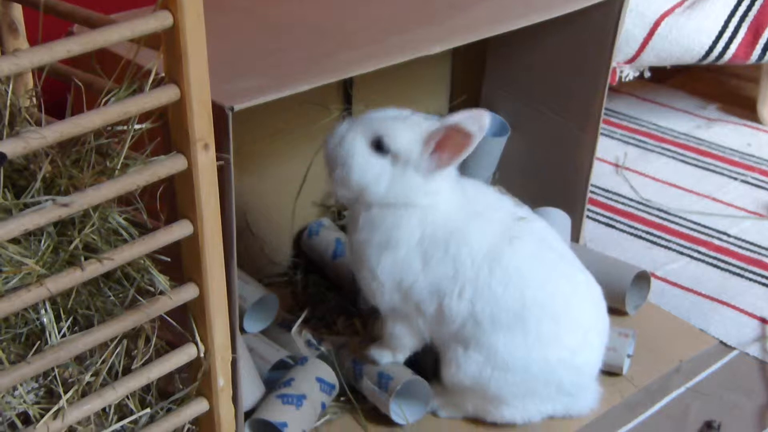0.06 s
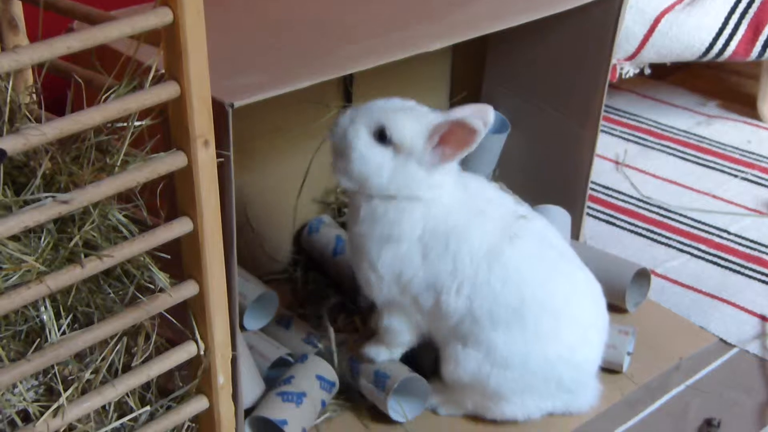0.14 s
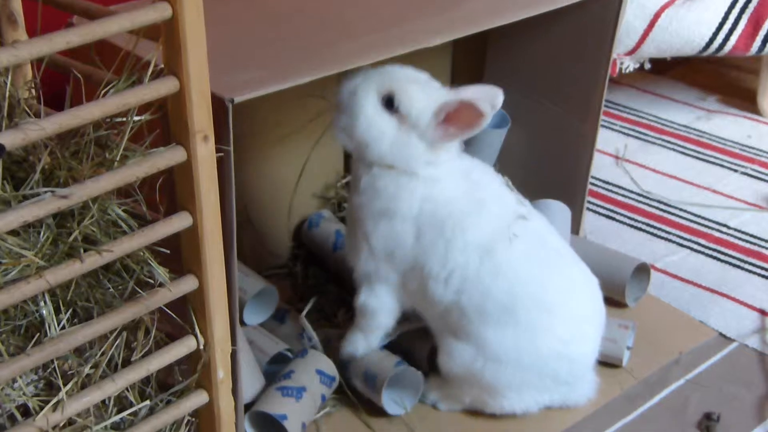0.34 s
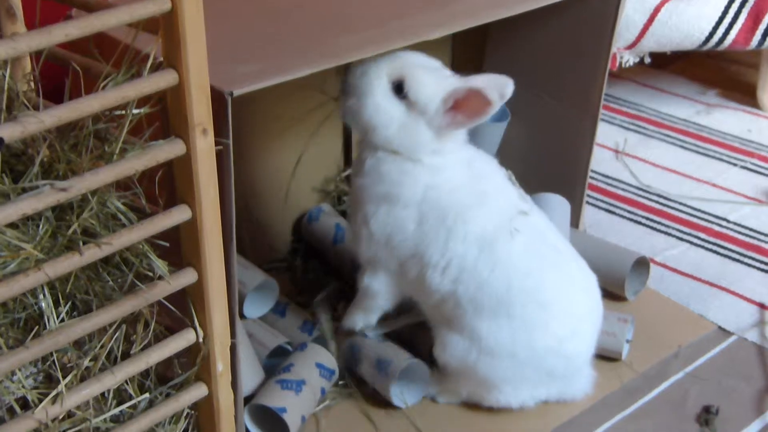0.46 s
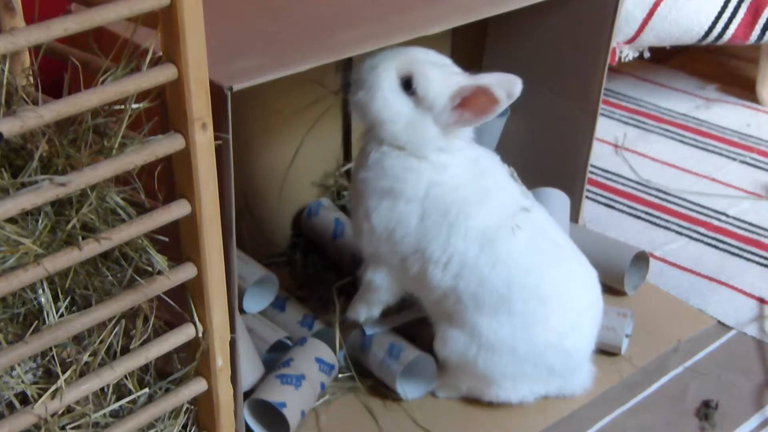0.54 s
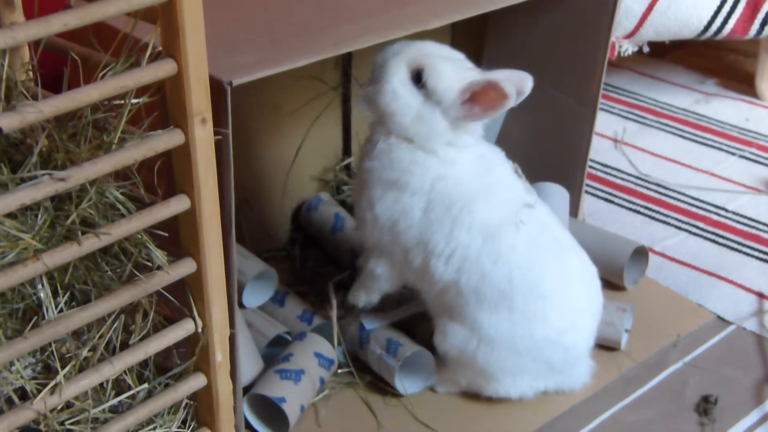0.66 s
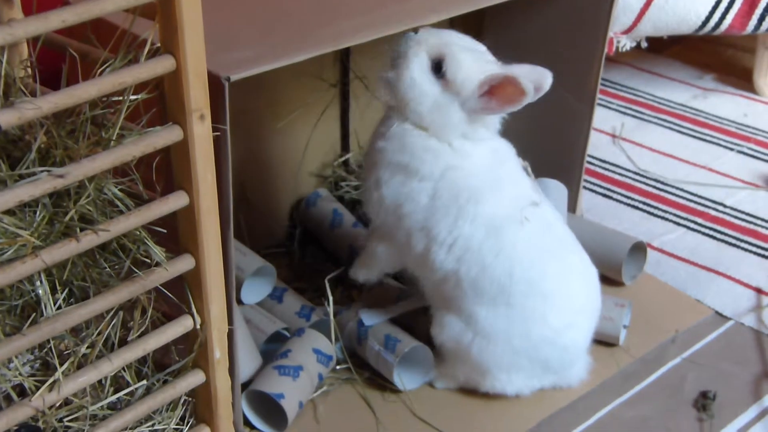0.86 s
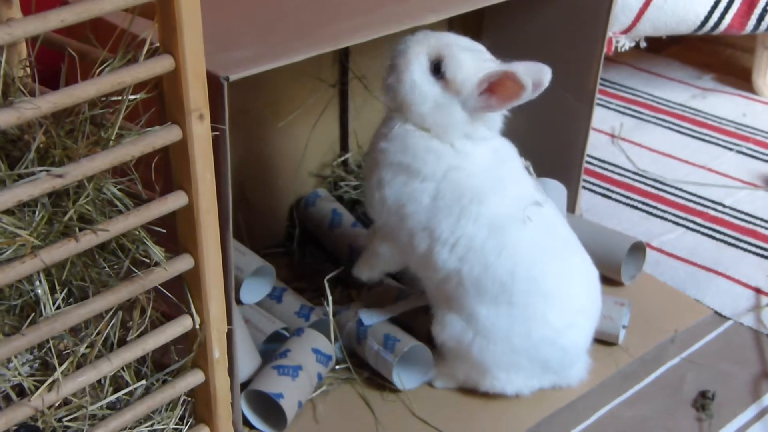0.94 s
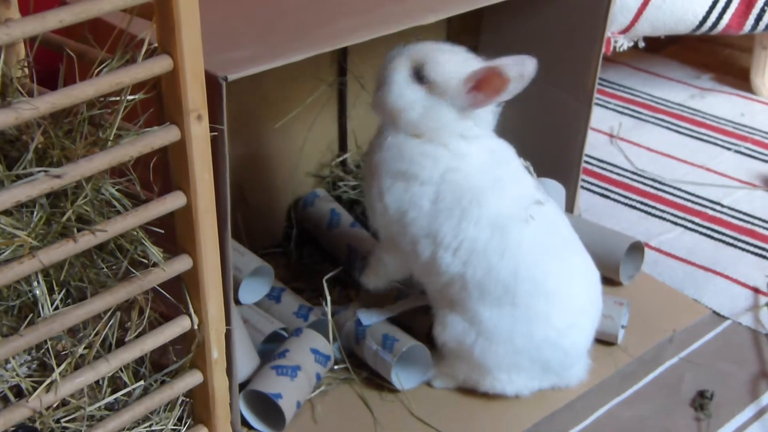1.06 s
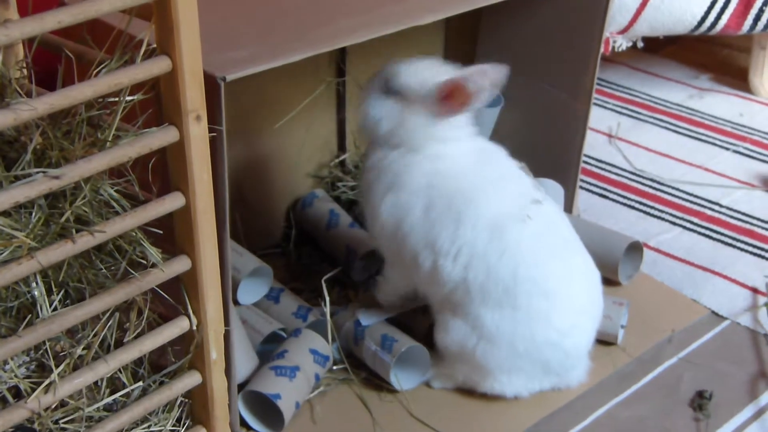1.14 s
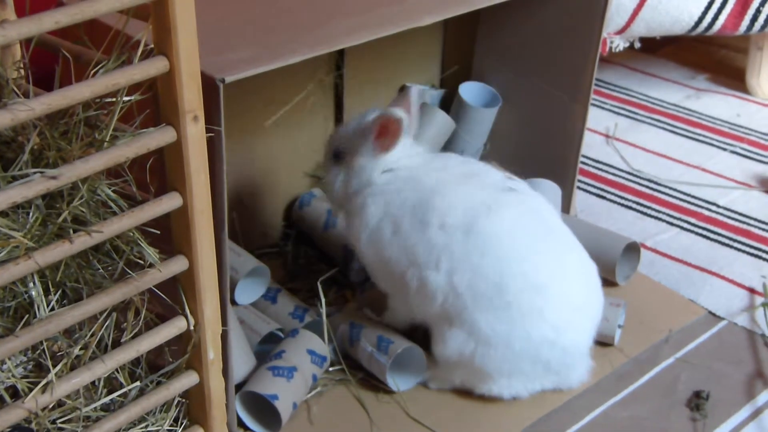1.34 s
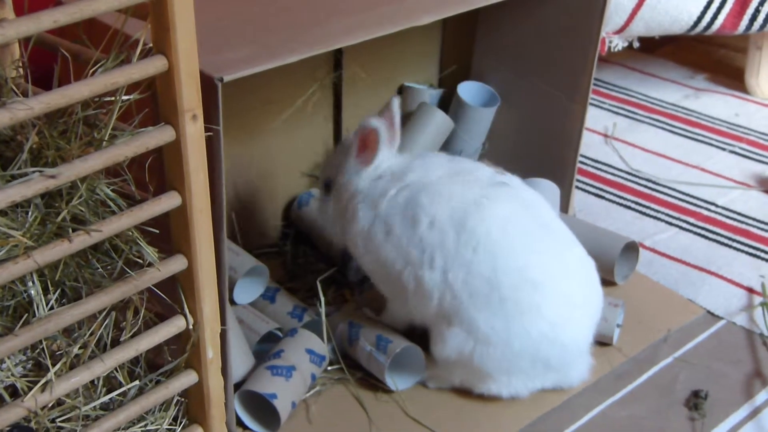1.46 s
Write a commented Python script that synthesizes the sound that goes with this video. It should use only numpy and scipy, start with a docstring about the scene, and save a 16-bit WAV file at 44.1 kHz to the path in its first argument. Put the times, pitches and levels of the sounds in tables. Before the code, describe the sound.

A rabbit squeaks twice, at about 0.6 and 0.85 seconds, slightly right of centre; each squeak is very short, high and rough, with a quick small-room echo. Earlier, from 0.2 to 0.5 seconds, hay rustles, cardboard tubes tick lightly and a dry stalk snaps near 0.3. From 1.0 to 1.4 seconds a paw softly bumps hollow cardboard and brushes it on the left. An appliance hums faintly throughout.

```python
"""A small room with a faintly humming appliance; a stereo microphone near a rabbit's hay and tubes.
The rabbit rears up: hay rustles, the cardboard tubes take light taps and a dry stalk snaps.
With a soft bump it squeaks, then squeaks again, a little right of centre. Each squeak is two rough
whistles at once, and the walls throw it back in a quick flutter. Last, a paw bumps the hollow
cardboard and brushes along it, off to the left."""
import sys
import numpy as np
from scipy import signal
from scipy.fft import rfft, irfft
from scipy.io import wavfile
from scipy.ndimage import uniform_filter1d

SR = 44100
rng = np.random.default_rng(int(sys.argv[2]) if len(sys.argv) > 2 else 0)


def dump_mix(stems):
    """Bounce the given channels to the path in sys.argv[1] as a 16-bit WAV at rate SR."""
    frames = np.atleast_2d(stems).T  # one column per channel
    limited = np.clip(frames, -1, 1)  # hard clip at full scale
    pcm = np.round(limited * 32767).astype(np.int16)
    wavfile.write(sys.argv[1], SR, pcm)


N = 66150
TIME = np.arange(N) / SR


def rabbit():
    """Two squeaks right of centre; the walls send each back duller, as a flutter and a tail."""
    # One list per squeak. Each row: time in seconds, low whistle in Hz, its level in dB,
    # its octave's level in dB, high whistle in Hz, its level in dB.
    squeaks = [
        [(.574, 3800, -59, -67, 5300, -78), (.581, 3930, -46, -49.5, 5340, -49),
         (.592, 4054, -35, -40, 5280, -42), (.596, 4172, -36, -52.5, 5430, -48),
         (.600, 4104, -32.5, -45, 5260, -32.5), (.606, 4085, -28, -59, 5453, -40),
         (.613, 4070, -36.5, -52, 5360, -37.5), (.620, 3980, -53, -53, 5310, -51)],
        [(.827, 3760, -66, -58, 5350, -80), (.834, 3970, -45, -48, 5170, -62),
         (.840, 4134, -42.5, -50, 5590, -52), (.847, 4140, -32, -42.5, 5603, -34.5),
         (.854, 4266, -42.5, -49.5, 5486, -40.5), (.864, 4324, -34.5, -48, 5580, -45),
         (.874, 4230, -59, -56, 5600, -66)],
    ]
    # Wall echoes. Each row: delay in seconds, level in dB.
    flutter = [(0.019, -7.5), (0.0409, -8), (.064, -15), (0.080, -28), (.093, -20.5)]
    entries_s, pans_db, rooms_db = [.593, .838], [-6, -4], [-2, -3.5]
    wall_cutoff_hz = 9700
    out = 0
    for contour, entry_s, pan_db, room_db in zip(squeaks, entries_s, pans_db, rooms_db):
        voice = squeak(contour, entry_s)
        dulled = signal.lfilter(*signal.butter(1, wall_cutoff_hz, fs=SR), voice)
        echoes = sum(amp(db) * np.roll(dulled, round(delay * SR)) for delay, db in flutter)
        out = out + panned(voice, pan_db) + reverb(dulled, room_db) + echoes
    return out


def squeak(contour, entry_s):
    """Two whistles rise together and blend into overtones, sum tones and difference tones."""
    # Each row: multiple of the low whistle, multiple of the high one, level in dB re their mean.
    blend_tones = [(3, 0, -17), (1, 1, -16), (0, 2, -18), (2, 1, -33), (-1, 2, -30)]
    times, *columns = np.transpose(contour)
    low_hz, low_db, octave_db, high_hz, high_db = (np.interp(TIME, times, c) for c in columns)
    low_jitter, high_jitter, jitter_hz = 0.0058, 0.0083, 292  # the high whistle is the rougher one
    low_phase = 2 * np.pi * np.cumsum(low_hz * (1 + low_jitter * wander(jitter_hz))) / SR
    high_phase = 2 * np.pi * np.cumsum(high_hz * (1 + high_jitter * wander(jitter_hz))) / SR
    held_db, shake_db, break_s, fade_s = -4, 4.5, 0.0033, 0.0018
    held = 1 - np.clip((TIME - entry_s) / break_s, 0, 1)  # the high whistle breaks in late
    high_db = high_db + held_db * held + shake_db * wander(rate_hz=170)
    low = amp(low_db) * np.sin(low_phase) + amp(octave_db) * np.sin(2 * low_phase)
    high = amp(high_db) * np.sin(high_phase)
    blends = sum(amp(db) * np.sin(m * low_phase + n * high_phase) for m, n, db in blend_tones)
    blends *= amp((low_db + high_db) / 2)
    # Each row: frequency in Hz, level in dB.
    rasp_spectrum = [(2500, -3.5), (4500, 1), (9000, 6), (15000, -15)]
    rasp = amp(low_db - 24.5) * colour(rng.standard_normal(N), rasp_spectrum)
    fade = np.clip(np.minimum(TIME - times[0], times[-1] - TIME) / fade_s, 0, 1)
    return np.sqrt(2) * fade * (low + high + blends + rasp)


def hay():
    """Stalks rub together under the body, and a few snap with a short bright ring."""
    # Each row: frequency in Hz, level in dB.
    rustle_spectrum = [(40, -32), (150, -7), (400, -12.5), (1200, -0.5), (2000, -6.5), (3500, -5.5),
                       (4600, -5), (6500, 2), (9500, 0.5), (12000, -1), (16000, -18)]
    # Each row: time in seconds, level in dB.
    rustle_levels = [(.04, -64), (.14, -70), (.19, -51.5), (.25, -49), (.29, -45.5), (.315, -49),
                     (.36, -52.5), (.40, -52.5), (.445, -52), (.48, -53), (.53, -64), (.8, -78), (.95, -65),
                     (1.5, -62)]
    # Each row: start in seconds, level in dB, main resonance in Hz.
    snap_events = [(0.3181, -23, 6165), (.3315, -40, 5980), (0.3349, -35, 6350), (0.3472, -33.5, 8100)]
    # Each row: ratio to the main resonance, level in dB, t60 in seconds.
    stalk_modes = [(.92, -2.5, 0.011), (1.04, 3.5, 0.01), (1.18, -12.5, 0.028), (1.5, -10, 0.013),
                   (1.9, -5, .009), (1.98, -17, 0.0098)]
    rise_s, top_hz = 0.00098, 13500
    rustle = colour(grains(), rustle_spectrum) * amp(follow(rustle_levels))
    snaps = sum(amp(db + mode_db) * ring(start, hz * ratio, rise_s, t60)
                for start, db, hz in snap_events
                for ratio, mode_db, t60 in stalk_modes if hz * ratio < top_hz)
    return room(rustle, wet_db=-2) + room(snaps, wet_db=-7.5)


def tube_taps():
    """Light taps on the tubes, each a dry tick of noise."""
    # Each row: start in seconds, level in dB.
    taps = [(0.1913, -42.5), (0.247, -36), (0.2746, -32.5), (0.437, -40.5), (0.4704, -39.5)]
    # Each row: frequency in Hz, level in dB.
    spectrum = [(60, -42), (200, 2), (900, -1.5), (2000, -15), (3500, 4.5), (6500, 5), (10000, 6),
                (16000, -13)]
    envelope = sum(amp(db) * strike(start, rise_s=0.00014, t60=0.017) for start, db in taps)
    return room(colour(rng.standard_normal(N), spectrum) * envelope, wet_db=-5)


def paw_bumps():
    """Each padded blow rings the cardboard's modes near one pitch; the paw scuffs as it slides."""
    # Each row: start in seconds, level in dB, pitch the blow favours in Hz.
    blows = [(0.563, -51, 290), (.588, -43.5, 246), (1.031, -45, 470), (1.0442, -39.5, 497),
             (1.052, -39, 990), (1.064, -39.5, 290), (1.078, -44, 225), (1.094, -49, 615),
             (1.121, -49, 200)]
    # Each row: frequency in Hz, level in dB, t60 in seconds.
    cardboard_modes = [(153, -1, 0.063), (221, -7, 0.11), (298, -3.5, 0.083), (399, -8.5, 0.11),
                       (458, 4.5, 0.039), (589, -2.5, 0.12), (970, -7.5, 0.038), (1122, -4, .06)]
    # Each row: frequency in Hz, level in dB.
    scuff_spectrum = [(50, -35), (200, -4.5), (600, 2.5), (1300, 3.5), (2000, -3.5), (3300, -3),
                      (6000, -10), (12000, -35)]
    # Each row: time in seconds, level in dB.
    scuff_levels = [(.94, -64), (1.025, -57), (1.05, -50.5), (1.085, -56.5), (1.12, -78), (1.16, -56),
                    (1.22, -71)]
    width_octaves, rise_s = 0.4, 0.0026
    bumps = 0
    for start, db, favoured_hz in blows:
        for hz, mode_db, t60 in cardboard_modes:
            excitation = np.exp(-(np.log2(hz / favoured_hz) / width_octaves) ** 2 / 2)
            bumps = bumps + amp(db + mode_db) * excitation * ring(start, hz, rise_s, t60)
    scuff = colour(grains(), scuff_spectrum) * amp(follow(scuff_levels))
    return room(bumps + scuff, wet_db=-4)


def paw_brushes():
    """Fur brushes the cardboard in short grainy strokes, left of the microphone."""
    # Each row: start in seconds, level in dB, rise in seconds, t60 in seconds.
    strokes = [(1.023, -50.5, 0.0023, 0.1), (1.106, -45.5, 0.0021, 0.2), (1.28, -53, 0.021, 0.19),
               (1.376, -58, 0.003, 0.12)]
    # Each row: frequency in Hz, level in dB.
    spectrum = [(150, -41.5), (500, -1), (1000, 2.5), (3000, -6), (5000, -7), (7500, -0.5), (10000, 9.5),
                (12000, 6.5), (14000, -2), (16000, -13)]
    envelope = sum(amp(db) * strike(start, rise_s, t60) for start, db, rise_s, t60 in strokes)
    return room(colour(grains(), spectrum) * envelope, wet_db=2.5, pan_db=11.5)


def appliance_hum():
    """An appliance's faint tones waver in level and phase; two of them swell and fade."""
    # Each row: frequency in Hz, level in dB.
    steady = [(103, -75.5), (296.1, -71.5), (546, -77), (834.4, -69.5), (1034, -73.5), (1081, -64),
              (3250, -79)]
    # Each row: frequency in Hz, then pairs of time in seconds and level in dB.
    swells = [(462.8, [(.04, -71.5), (.15, -62), (.25, -58.5), (.30, -66.5), (.7, -70), (.8, -69),
              (.9, -56), (.97, -62), (1.5, -70.5)]), (116, [(.04, -68), (.8, -69), (.96, -62.5),
              (1.02, -68), (1.12, -61.5), (1.26, -56.5), (1.31, -73)])]
    waver_db, drift_rad, spread_rad = 2.5, 0.49, 0.53
    narrow_below_hz = 396  # lower tones reach both sides more and more alike
    hum = 0
    for hz, db in steady + [(hz, follow(levels)) for hz, levels in swells]:
        gain = amp(db + waver_db * wander(rate_hz=12.7))
        phase = 2 * np.pi * (hz * TIME + rng.random()) + drift_rad * wander(rate_hz=9.7)
        side_phase = spread_rad * min(hz / narrow_below_hz, 1) * rng.standard_normal((2, 1))
        hum = hum + gain * np.sin(phase + side_phase)
    return np.sqrt(2) * hum


def room_tone():
    """Soft, patchy room noise whose bass is nearly the same on both sides."""
    # Each row: frequency in Hz, relative noise density in dB.
    spectrum = [(25, 0), (60, -12.5), (110, -9), (160, -3.5), (250, 1), (320, 2.5), (640, 2.5), (760, -1.5),
                (1100, -6.5), (1440, -10.5), (2600, -19), (3200, -15.5), (4500, -14.5), (6400, -12),
                (8000, -18.5), (9600, -10), (12500, -25.5), (16000, -27)]
    # Each row: frequency in Hz, left-right correlation.
    likeness = [(30, 0.87), (80, 0.92), (160, 0.41), (300, 0.031), (1000, 0.047), (4000, 0.093),
                (12000, 0.42)]
    level_db, patchy_db = -55, 3
    hz, _, (left, other) = signal.stft(rng.standard_normal((2, N)), SR, nperseg=2048, noverlap=1536)
    same = read(likeness, hz)[:, None]
    right = same * left + np.sqrt(1 - same ** 2) * other
    patches = uniform_filter1d(rng.standard_normal(left.shape), size=14, axis=0)  # across frequency
    patches = unit(uniform_filter1d(patches, size=6, axis=1))  # across time
    bands = np.array([left, right]) * amp(read(spectrum, hz)[:, None] + patchy_db * patches)
    return amp(level_db) * unit(signal.istft(bands, SR, nperseg=2048, noverlap=1536)[1][:, :N])


def reverb(x, wet_db):
    """The small room's diffuse tail, each band dying at its own speed."""
    # Each row: frequency in Hz, t60 in seconds.
    decay_times = [(150, 0.56), (600, 0.42), (2000, 0.21), (4100, 0.28), (5600, 0.26), (8000, 0.3),
                   (15000, 0.2)]
    crossfeed, build_s = 0.21, 0.0011
    hz, t, bands = signal.stft(rng.standard_normal((2, SR // 2)), SR, nperseg=256)
    decay = np.exp(-np.log(1000) * t / read(decay_times, hz)[:, None])
    tail = signal.istft(bands * decay, SR, nperseg=256)[1]
    onset = np.minimum(np.arange(tail.shape[1]) / SR / build_s, 1)
    tail = (tail + crossfeed * tail[::-1]) * onset
    return amp(wet_db) * signal.fftconvolve(x[None], tail / np.linalg.norm(tail[0]), axes=1)[:, :N]


def room(x, wet_db, pan_db=0):
    """What reaches the microphone: direct sound plus its tail."""
    return panned(x, pan_db) + reverb(x, wet_db)


def panned(x, pan_db):
    """Places a sound with the left side pan_db above the right."""
    return x * amp([[pan_db / 2], [-pan_db / 2]])


def grains(per_second=4200, spread_db=2.5):
    """Friction: a dense train of tiny clicks of uneven size."""
    size = amp(spread_db * np.minimum(rng.exponential(1, N), 4))
    return size * rng.choice([-1, 1], N) * (rng.random(N) < per_second / SR)


def ring(start, hz, rise_s, t60):
    """One struck mode: a decaying sine."""
    return strike(start, rise_s, t60) * np.sin(2 * np.pi * hz * (TIME - start))


def strike(start, rise_s, t60):
    """Envelope: a short rise, then a fall of 60 dB every t60 seconds."""
    age = TIME - start
    return np.clip(age / rise_s, 0, 1) * np.exp(-np.log(1000) * np.maximum(age - rise_s, 0) / t60)


def wander(rate_hz):
    """Smooth random motion at rms 1."""
    hz = np.fft.rfftfreq(N, 1 / SR)
    return unit(irfft(rfft(rng.standard_normal(N)) * np.exp(-(hz / rate_hz) ** 2), N))


def colour(x, spectrum):
    """Gives noise a spectrum, at rms 1."""
    return unit(irfft(rfft(x) * amp(read(spectrum, np.fft.rfftfreq(N, 1 / SR))), N))


def read(points, hz):
    """Reads a table on a log-frequency axis."""
    table_hz, values = np.transpose(points)
    return np.interp(np.log(hz + 1), np.log(table_hz + 1), values)


def follow(points):
    """Reads a table along time."""
    return np.interp(TIME, *np.transpose(points))


def amp(db):
    """Decibels to gain."""
    return 10 ** (np.asarray(db) / 20)


def unit(x):
    """Scales to rms 1."""
    return x / np.sqrt(np.mean(x ** 2) + 1e-20)


def scene():
    """The rabbit, its hay and tubes, and the room behind them."""
    return rabbit() + hay() + tube_taps() + paw_bumps() + paw_brushes() + appliance_hum() + room_tone()


def record(dry):
    """The microphone opens after a moment and loses the very top of the treble."""
    open_s, fade_s, cutoff_hz = .034, .002, 16100
    opened = dry * np.clip((TIME - open_s) / fade_s, 0, 1)
    lowpass = signal.firwin(511, cutoff_hz, window=("kaiser", 9), fs=SR)
    return signal.oaconvolve(opened, lowpass[None], "same")


dry = scene()
out = record(dry)
dump_mix(out)
```